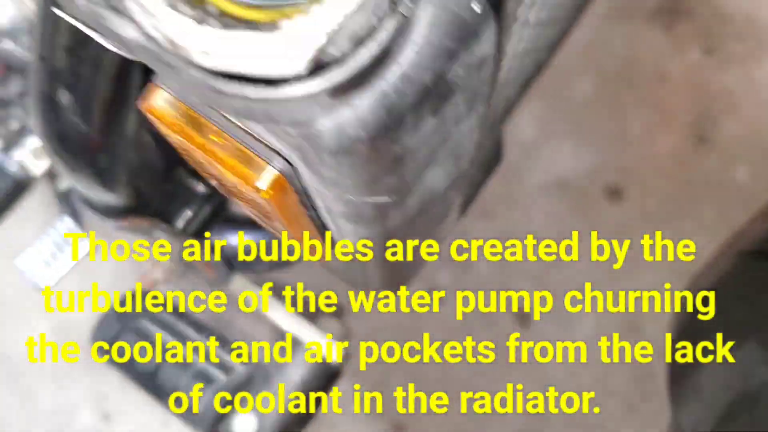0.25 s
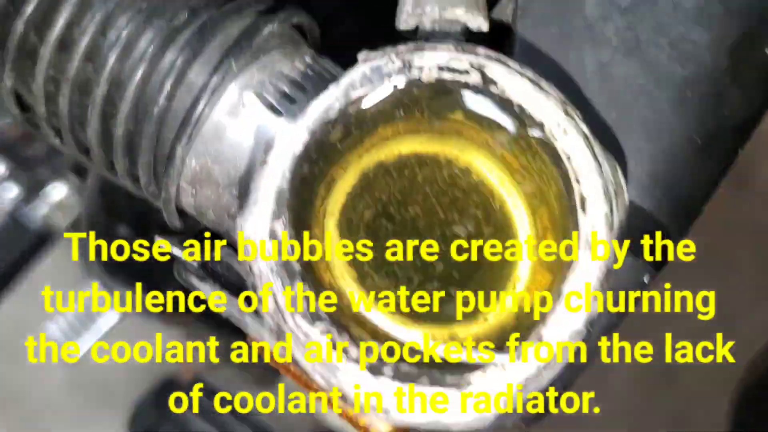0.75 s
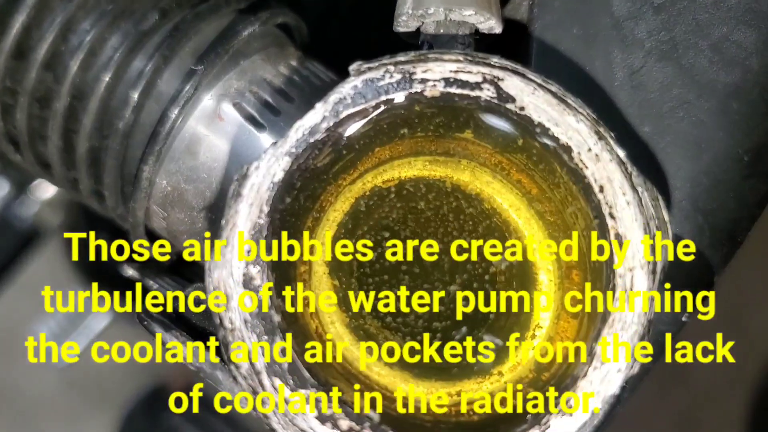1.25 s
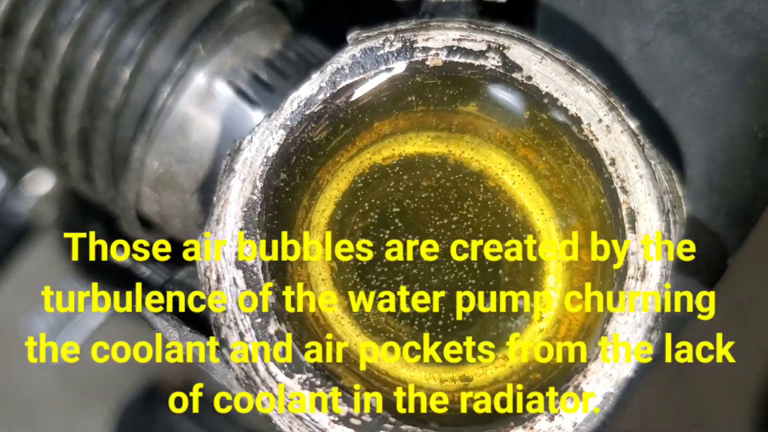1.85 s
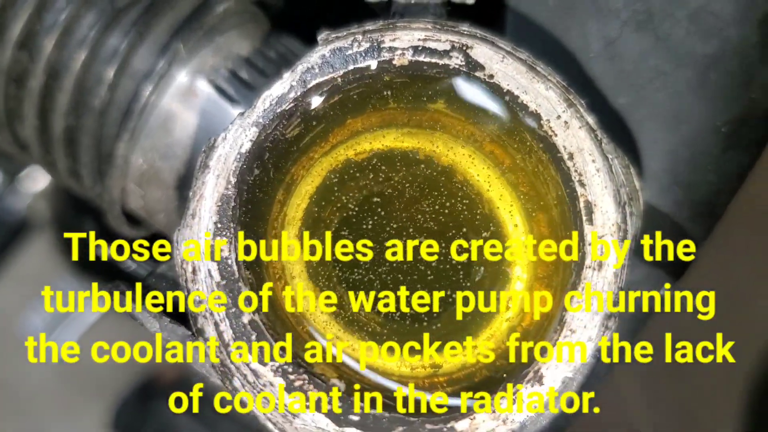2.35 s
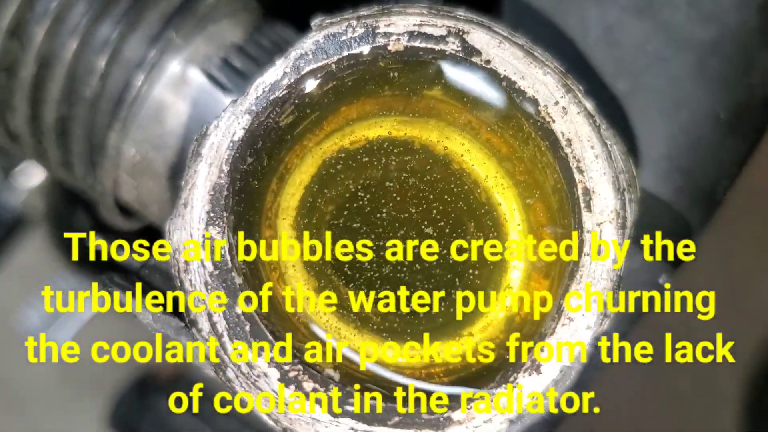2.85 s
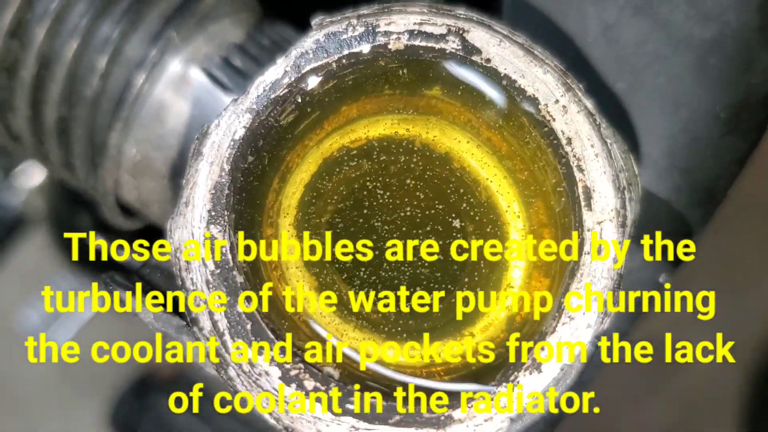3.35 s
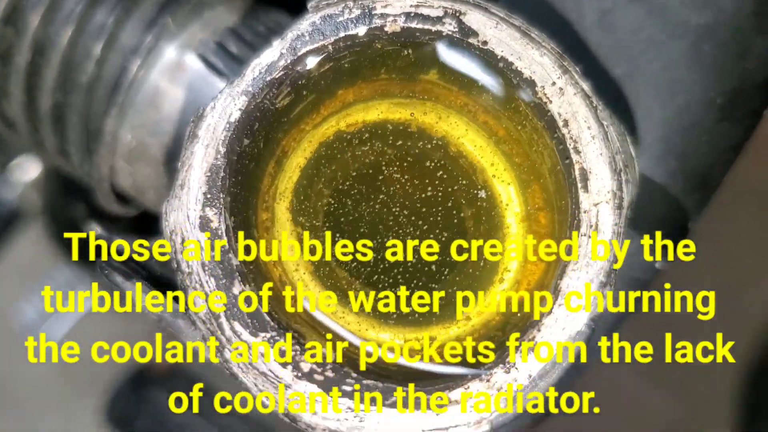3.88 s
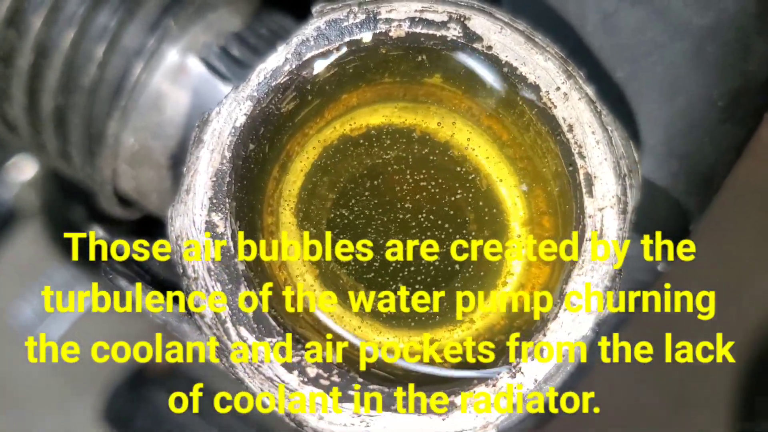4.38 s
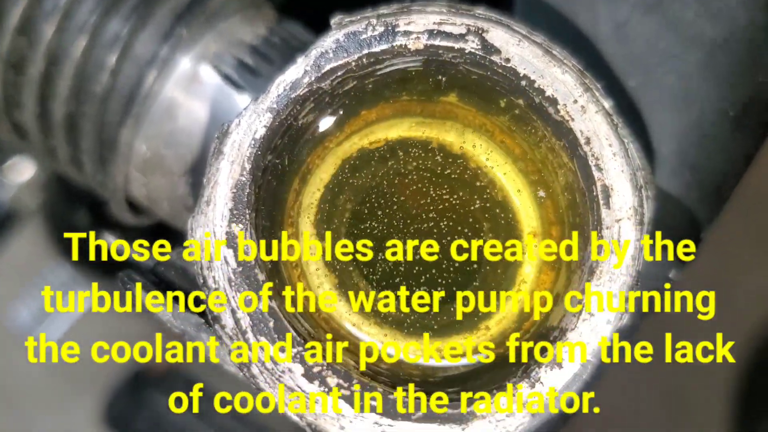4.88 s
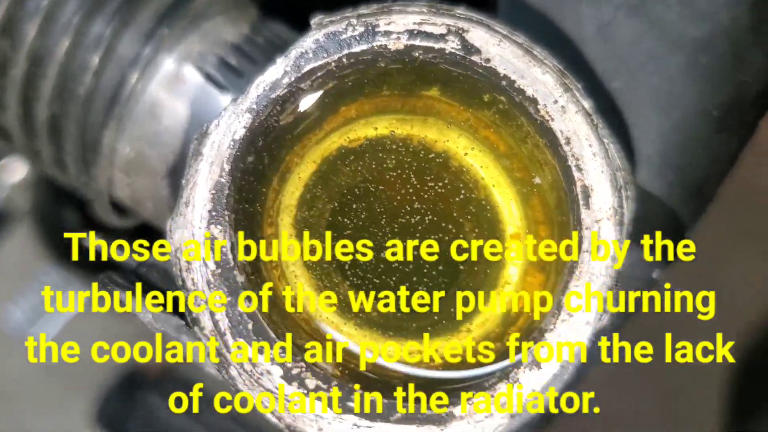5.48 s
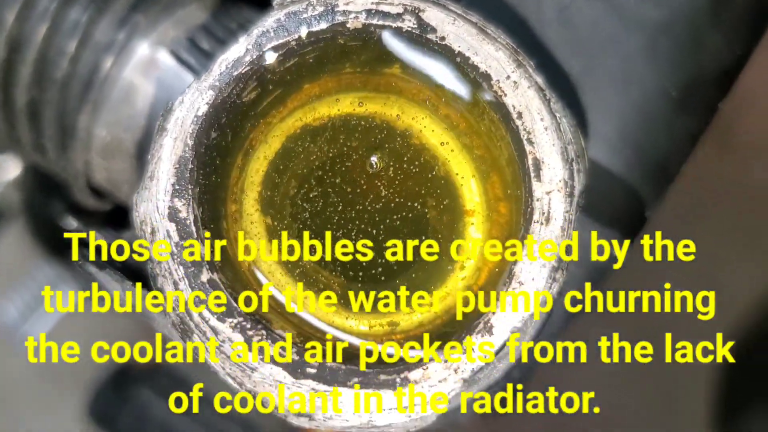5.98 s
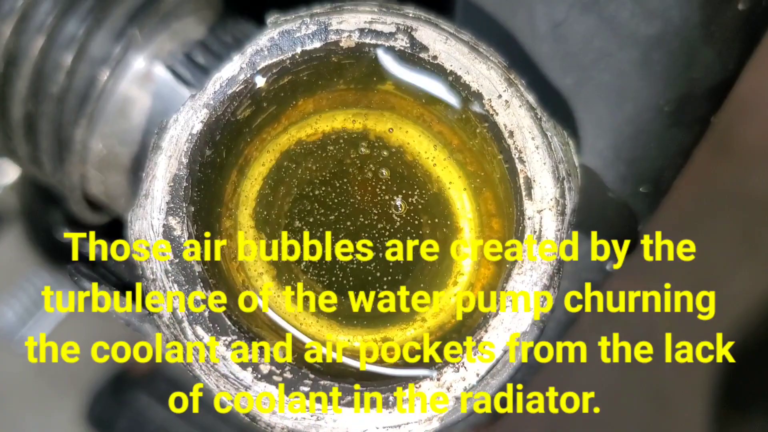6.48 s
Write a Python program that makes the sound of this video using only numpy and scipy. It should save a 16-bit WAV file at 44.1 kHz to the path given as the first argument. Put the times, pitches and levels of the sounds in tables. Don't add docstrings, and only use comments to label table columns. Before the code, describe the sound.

Lumpy twin-cylinder engine idle with misfires, gear whine and mechanical rattle, one short growling rev, then a falling return to slow thudding.

```python
import sys
import numpy as np
from scipy import signal
from scipy.io import wavfile
from scipy.ndimage import uniform_filter1d

SR = 44100
rng = np.random.default_rng(int(sys.argv[2]) if len(sys.argv) > 2 else 0)


def generate_wav(signal):
    frames = np.transpose(np.atleast_2d(signal))
    scaled = np.clip(frames, -1, 1) * 32767
    pcm = np.round(scaled).astype(np.int16)
    wavfile.write(sys.argv[1], SR, pcm)


def convert_level_to_amplitude(level_db):
    exponent = np.asarray(level_db, float) / 20
    return 10 ** exponent


N = 296793

# (time [s], strength of the blow-down pulse [share])
UNEVEN = [(0.08, 0.07), (0.26, 0.2), (0.38, 0.13), (0.82, 0.18), (0.88, 0.09), (1.14, 0.67), (1.33, 0.0),
          (1.39, 0.83), (2.04, 0.0), (2.23, 0.67), (2.42, 0.72), (2.48, 0.28), (2.55, 0.05), (2.68, 1.0),
          (2.74, 0.81), (2.88, 0.75), (3.01, 0.66), (3.22, 0.17), (3.49, 0.81), (3.56, 0.14), (3.62, 0.14),
          (3.69, 0.63), (4.08, 0.82), (4.21, 0.64), (4.27, 0.09), (6.29, 0.27), (6.37, 0.69), (6.44, 0.16),
          (6.51, 0.74), (6.66, 0.67)]
# (time [s], strength of the blow-down pulse [share], strength of the valve-closing pulse [share])
MISSES = [
    (1.72, 0.15, -0.46),
    (2.81, 0.14, -1.3),
    (3.08, .47, -.8),
    (3.15, .31, -1.2),
]
# (time [s], opening [share])
THROTTLE = [
    (0, 0.28),
    (4.42, 0.22),
    (4.52, 0.98),
    (4.86, 0.56),
    (4.97, 0),
    (6.73, 0.21),
]
MERGE_SPAN = 5.0
DEEP_SPAN = 1.0


def in_time(rows):
    s, *columns = np.transpose(rows)
    return [np.interp(np.arange(N) / SR, s, c) for c in columns]


def at_hz(points, hz):
    point_hz, db = np.transpose(points)
    return np.interp(np.log(hz), np.log(np.maximum(point_hz, 1)), db)


def rms_one(x):
    return x / np.sqrt(np.mean(x ** 2) + 1e-20)


def drift(rate):
    r = np.exp(-80 * np.pi * rate / SR)
    slow = signal.lfilter([1], [1, -2 * r, r * r], rng.standard_normal(N // 40 + 2002))[2000:]
    return np.interp(np.arange(N) / 40, np.arange(len(slow)), rms_one(slow))


def resonance(x, hz, width):
    r = np.exp(-np.pi * width / SR)
    poles = [1, -2 * r * np.cos(2 * np.pi * hz / SR), r * r]
    return signal.lfilter((1 - r * r) / 2 * np.array([1, 0, -1]), poles, x + 1e-18)


def rush(spectrum, patchy_db, count):
    # (frequency [Hz], likeness [share])
    likeness = [(60, 0.81), (130, 1), (290, 0.71), (640, 0.54), (1410, 0.013), (3100, 0.067), (6820, 0.022),
                (15000, 0.032)]
    out = 0
    edges = np.geomspace(spectrum[0][0], spectrum[-1][0], count + 1)
    white = rng.standard_normal((2, 2, N))
    together = drift(4.4)
    for k, (low, high) in enumerate(zip(edges, edges[1:])):
        band = signal.butter(2, [low, high], "band", fs=SR, output="sos")
        mid, side = signal.sosfilt(band, white[k % 2])
        hz = np.sqrt(low * high)
        alike = np.clip(at_hz(likeness, hz), -1, 1)
        gain = convert_level_to_amplitude(at_hz(spectrum, hz) + patchy_db * (together + 0.49 * drift(30)))
        out = out + gain * (np.sqrt(1 + alike) * mid + np.sqrt(1 - alike) * side * [[1], [-1]])
    return rms_one(out)


def after(s, fade_s):
    lead_s, rise_s = 0.017, 0.02
    late = np.maximum(np.arange(N) / SR - s + lead_s, 0)
    return np.minimum(late / rise_s, 1) * np.exp(-late / fade_s)


def merged(speed, span=MERGE_SPAN):
    merge_from = 16.5
    return np.clip((speed - merge_from) / span, 0, 1) * (np.arange(N) / SR > THROTTLE[1][0])


def crank():
    # (time [s], speed [four-stroke cycles per s])
    slow_run = [(0.0, 15.94), (0.327, 16.84), (0.569, 16.06), (1.67, 15.55), (2.148, 16.1), (2.952, 14.83),
                (3.714, 15.68), (3.921, 15.04), (4.411, 16.14), (4.552, 24.26), (4.811, 51.7),
                (4.914, 53.22), (5.236, 37.07), (5.494, 27.79), (5.802, 18.7), (6.094, 14.43),
                (6.204, 13.9), (6.73, 13.71)]
    kick_per_share, kick_zero_share, miss_loss, fade_s = 0.708, 0.48, 0.734, 0.204
    kicks = sum((share - kick_zero_share) * after(s, fade_s) for s, share in UNEVEN)
    losses = sum(after(np.round(s, 2), fade_s) for s, _, _ in MISSES)
    return in_time(slow_run)[0] + kick_per_share * kicks - miss_loss * losses


def moving_parts(cycle, speed_db, throttle, hush):
    # (frequency [Hz], level [dB per Hz])
    casing_spectrum = [(1050, -8), (1150, -3.5), (1320, -0.5), (1780, -2), (1940, -0.5), (2670, -2),
                       (2790, 3), (3780, -5.5), (6000, -14), (7000, 9)]
    hiss_spectrum = [(2940, -21), (5000, 3), (6240, 3), (8230, -4.5), (9130, -1), (14400, -1), (15400, -11)]
    roar_spectrum = [(220, -7), (300, 0), (400, -7.5), (440, -5.5), (500, -6.5), (630, -5), (700, -13.5),
                     (860, -8), (930, -1.5), (1100, -13), (1300, -38)]
    rumble_spectrum = [(46, -9), (60, -4.5), (100, -11), (180, -15), (260, -22)]
    # (frequency [Hz], width [Hz], level [dB])
    casing_rings = [(1363, 14, -15.5), (2080, 700, -7), (2446, 78, -16.5), (2603, 30, -9), (2780, 55, -66),
                    (3440, 27, -20.5), (4345, 39, -16.5), (5330, 54, -33.5), (6210, 43, -19),
                    (8970, 230, -21), (11400, 120, -28), (12946, 120, -58)]

    casing = rush(casing_spectrum, patchy_db=1.12, count=7)
    white = rng.standard_normal((2, N))
    for hz, width, db in casing_rings:
        casing = casing + convert_level_to_amplitude(db) * rms_one(resonance(white, hz, width))
    casing = rms_one(casing) * convert_level_to_amplitude(0.5 * np.cos(2 * np.pi * (3 * cycle + 0.017)))

    hiss_db = -9 + 0.47 * np.cos(2 * np.pi * (cycle + 0.75))
    hiss = rush(hiss_spectrum, patchy_db=0.0, count=5) * convert_level_to_amplitude(hiss_db)
    roar_db = -4 + 2.5 * throttle - 0.3 * speed_db
    roar = rush(roar_spectrum, patchy_db=0.5, count=9) * convert_level_to_amplitude(roar_db)
    rumble = rush(rumble_spectrum, patchy_db=-2.0, count=4) * convert_level_to_amplitude(-30.5)

    casing_db = -36 + 1.0757 * speed_db - 0.5 * hush
    boom_db = 6 * after(THROTTLE[4][0], fade_s=2.2)
    return np.sqrt(2) * convert_level_to_amplitude(casing_db - 1.5) * (casing + hiss + roar) + convert_level_to_amplitude(boom_db - 1.5) * rumble


def whine(cycle, speed, throttle, hush):
    # (frequency [Hz], level [dB])
    gear_cover = [(900, -1), (955, -2.5), (1005, 4), (1060, -1), (1220, -1), (1500, 6), (1800, -1),
                  (2050, 2.5)]
    teeth_per_cycle = 65.8
    level_db = -39.5 + at_hz(gear_cover, teeth_per_cycle * speed) - 9 * throttle - hush
    driven = np.cumsum(uniform_filter1d(speed, size=SR // 8)) / SR
    wobble = np.sin(2 * np.pi * (2 * cycle + 0.31)) + 0.68 * np.sin(2 * np.pi * (cycle + 0.4))
    ripple = 1.4 * (9.3 / speed) ** 2 * wobble
    load_db = level_db + 3.0 * np.cos(2 * np.pi * (2 * cycle - 0.35)) + drift(30)
    mesh = 2 * np.pi * teeth_per_cycle * driven + ripple + 0.6 * drift(21)
    sides = []
    for turn in (0.0, 1.5):
        loudness = np.sqrt(2) * convert_level_to_amplitude(load_db + 1.5 * drift(25))
        sides.append(loudness * np.sin(mesh + turn + 0.45 * drift(20)))
    return np.array(sides)


def racing(cycle, speed, throttle):
    # (multiple of the cycle [count], level on open throttle [dB], level on shut throttle [dB])
    orders = [(1, -33, -25), (2, -23, -31), (3, -46, -29.5), (4, -27.5, -27.5), (5, -38, -39),
              (6, -29, -33.5), (8, -31, -41.5)]
    # (frequency [Hz], level [dB])
    pipe = [(30, -30), (47, -1.5), (57, 8.5), (72, 6), (90, 8), (130, 5), (212, 5), (260, -3.5)]
    out = 0
    for multiple, open_db, shut_db in orders:
        k = round(multiple)
        if k == 3:
            shut_db = shut_db + 13 * (1 - merged(speed, span=6.0))
        db = throttle * open_db + (1 - throttle) * shut_db + at_hz(pipe, k * speed)
        share = merged(speed, DEEP_SPAN if k <= 3 else MERGE_SPAN)
        loudness = np.sqrt(2) * convert_level_to_amplitude(db + 2.8 * drift(17))
        out = out + share * loudness * np.sin(2 * np.pi * (k * cycle + rng.random()))
    return out


def moments(cycle, place):
    return np.flatnonzero(np.diff(np.floor(cycle - place))) + 1


def exhaust_pulses(cycle, speed, throttle):
    steady, weak = moments(cycle, -0.112), moments(cycle, 0.399)
    steady_shut, weak_shut = moments(cycle, 0.0), moments(cycle, 0.57)
    blows, closings = np.zeros((2, N))
    chance = rng.standard_normal((140, 4))
    blows[steady] = 1 + 0.05 * chance[:len(steady), 0]
    closings[steady_shut] = 1 + 0.08 * chance[:len(steady_shut), 1]
    closings[weak_shut] = 1 + 0.06 * chance[:len(weak_shut), 2]

    idle_share, throttle_share = 0.49, 0.3
    usual = idle_share + (throttle_share - idle_share) * throttle[weak]
    blows[weak] = usual + 0.091 * chance[:len(weak), 3]
    overrun = (merged(speed, DEEP_SPAN) > 0.5) & (throttle <= 0)
    blows[weak[overrun[weak]]] = 0.12
    closings[weak_shut] *= np.where(overrun[weak_shut], 0.2, 1.295)
    closings = closings * convert_level_to_amplitude(-9 * overrun)

    for s, blow in UNEVEN:
        blows[weak[np.argmin(abs(weak / SR - s))]] = blow
    for s, blow, close in MISSES:
        k = np.argmin(abs(weak / SR - s))
        blows[weak[k]] = blow
        closings[weak_shut[np.searchsorted(weak_shut, weak[k])]] = close
    return blows, closings


def exhaust(cycle, speed, speed_db, throttle):
    # (time [s], level [dB])
    burn_level = [
        (0, -1),
        (3, -2.5),
        (4.4, -1),
        (4.5, -2.5),
        (4.6, -32),
        (5.6, -14),
        (5.74, -4.5),
        (6.3, -4.5),
        (6.73, -6),
    ]
    # (frequency [Hz], width [Hz], level [dB], sign [+1 or -1])
    blow_modes = [(56.4, 13.9, -24, -1), (100.5, 27.1, -21.5, 1), (136, 13.3, -22.5, 1),
                  (174.2, 46.4, -27.5, -1)]
    close_modes = [(61.25, 9, -19, -1), (154.3, 31.2, -32, 1)]
    # (frequency [Hz], width [Hz], level [dB])
    bark_modes = [(253.7, 5.8, -47.5), (317.7, 10.5, -49), (373, 46, -76), (470.8, 6.2, -49.5),
                  (638, 54, -59.5), (645.5, 14.5, -54)]
    growl_modes = [(497.5, 23, -48.5), (602, 10, -47.5), (674, 120, -55.5), (864, 54, -55), (975, 52, -65)]

    blows, closings = exhaust_pulses(cycle, speed, throttle)
    pulse_gain = SR / 31
    burn = convert_level_to_amplitude(in_time(burn_level)[0]) * pulse_gain
    thud = np.zeros(N)
    for train, modes in ((blows, blow_modes), (closings, close_modes)):
        for hz, width, db, sign in modes:
            thud += np.sign(sign) * convert_level_to_amplitude(db) * resonance(train * burn, hz, width)
    first = int(SR / speed[0])
    thud[:first] = thud[first:2 * first]

    edges = (blows + 0.73 * closings) * convert_level_to_amplitude(2.5 * rng.standard_normal(N)) * pulse_gain
    edges = edges * convert_level_to_amplitude(0.6 - 0.5 * speed_db)
    bark = 0
    for k, (hz, width, db) in enumerate(bark_modes):
        bark = bark + (-1) ** k * convert_level_to_amplitude(db) * resonance(edges, hz, width)

    growl_db = -18 + 2.22 * speed_db + 12 * throttle - 2 * (1 - merged(speed))
    even = (blows != 0) * convert_level_to_amplitude(1.2 * rng.standard_normal(N)) * pulse_gain * convert_level_to_amplitude(growl_db)
    growl = 0
    for k, (hz, width, db) in enumerate(growl_modes):
        growl = growl + (-1) ** k * convert_level_to_amplitude(db) * resonance(resonance(even, hz, 3 * width), hz, width)
    return thud + bark + growl


def scene():
    speed = crank()
    throttle = in_time(THROTTLE)[0]
    cycle = -0.8136 + np.cumsum(speed) / SR
    speed_db = 20 * np.log10(speed / 15.5)
    hush = sum(after(s, fade_s=0.045) for s, _, _ in MISSES)
    low = exhaust(cycle, speed, speed_db, throttle) + racing(cycle, speed, throttle)
    late = np.interp(np.arange(N) - 11.0, np.arange(N), low)
    gear = whine(cycle, speed, throttle, hush)
    parts = moving_parts(cycle, speed_db, throttle, hush)
    return np.array([low * convert_level_to_amplitude(-2.32), late * convert_level_to_amplitude(-1.7)]) + gear + parts


def band_limit(x):
    return signal.sosfilt(signal.butter(12, 16170, fs=SR, output="sos"), x)


def record(dry):
    # (time [s], level [dB])
    turn_down = [
        (0, 0.5),
        (4.55, 1),
        (4.8, -1.5),
        (5.28, -5.5),
        (5.98, -8),
        (6.33, -4.5),
        (6.73, -0.5),
    ]
    bass_cut = signal.butter(2, 39.2, "high", fs=SR, output="sos")
    top_cut = signal.cheby2(14, 60, 15900, fs=SR, output="sos")
    ducked = dry * convert_level_to_amplitude(in_time(turn_down)[0])
    mix = signal.sosfilt(np.vstack([bass_cut, bass_cut, top_cut]), ducked)
    return band_limit(mix)


dry = scene()
out = record(dry)
generate_wav(out)
```